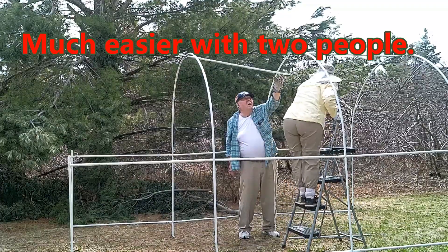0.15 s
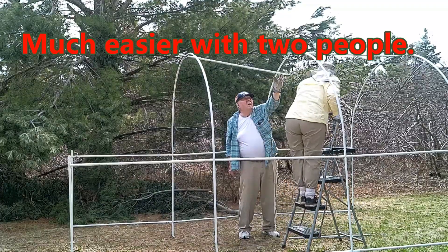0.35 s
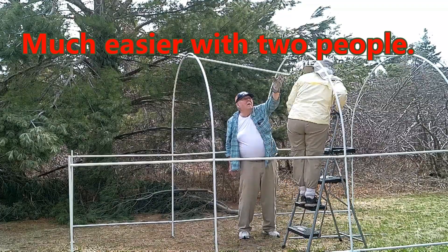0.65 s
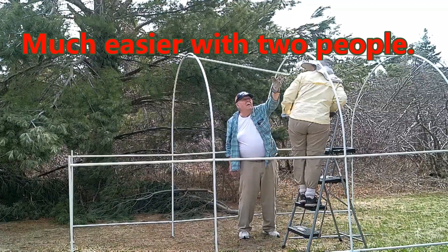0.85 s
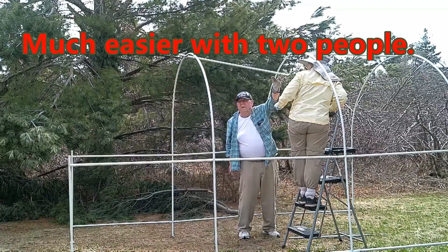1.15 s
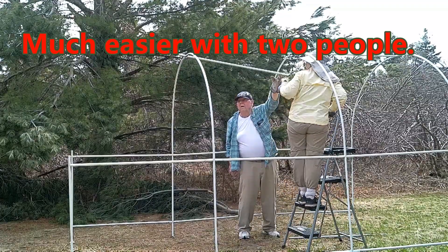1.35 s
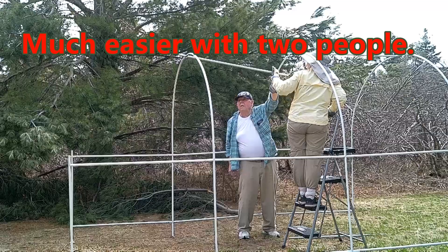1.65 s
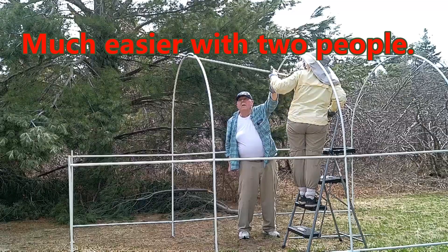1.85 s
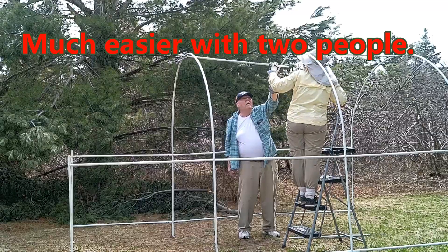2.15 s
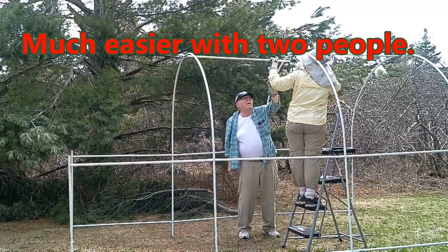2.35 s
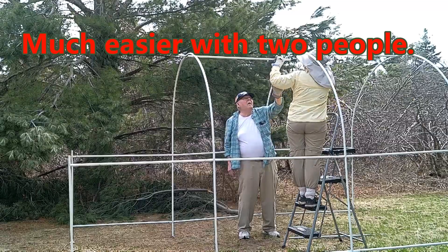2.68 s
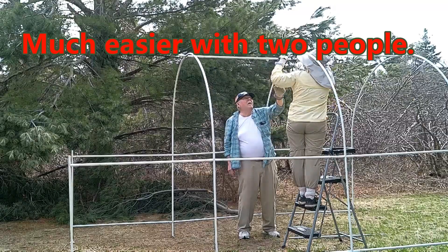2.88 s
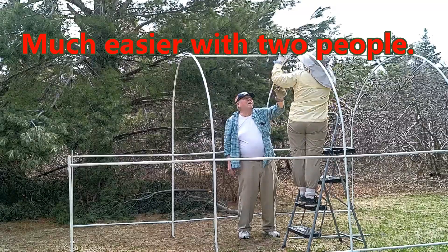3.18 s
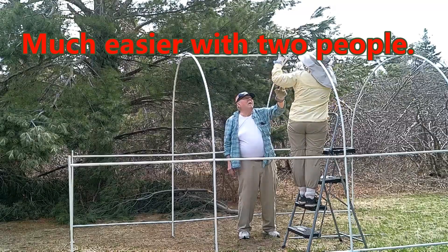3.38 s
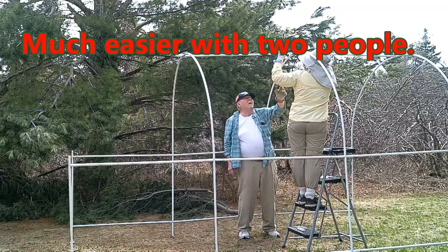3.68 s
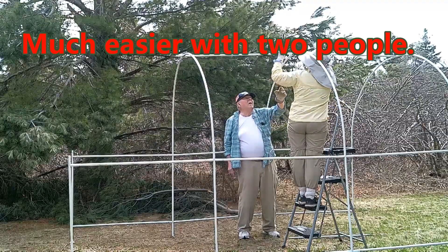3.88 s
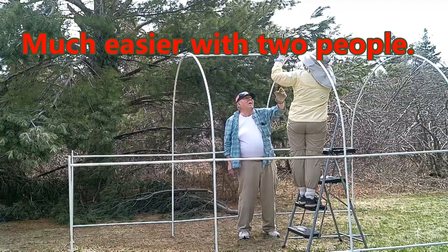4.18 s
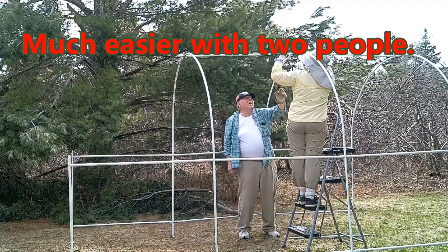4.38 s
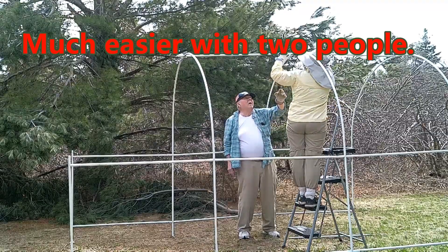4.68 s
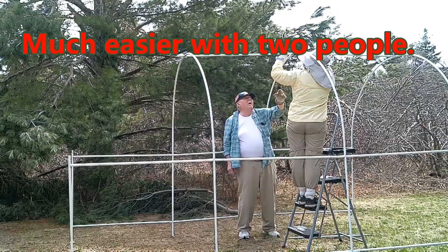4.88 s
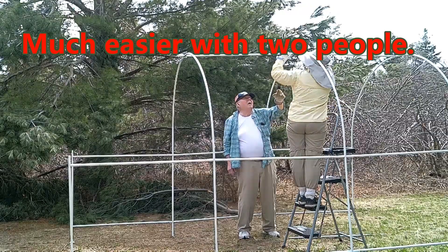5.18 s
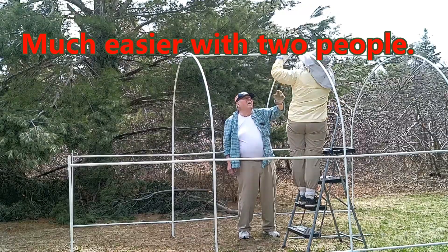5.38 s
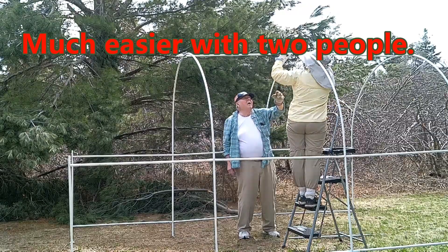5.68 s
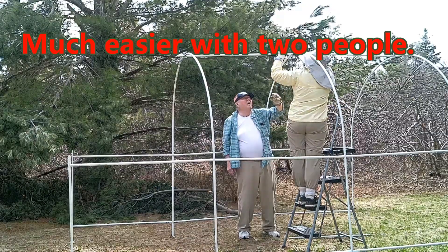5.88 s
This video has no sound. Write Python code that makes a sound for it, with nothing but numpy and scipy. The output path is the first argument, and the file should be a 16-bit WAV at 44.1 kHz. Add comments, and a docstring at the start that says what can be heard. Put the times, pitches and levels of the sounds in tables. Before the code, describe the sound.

Countless small frogs whistle far off behind the trees, merging into a continuous high-pitched chorus while a breeze buffets the microphone with a low rumble. Plastic pipes knock once dully, later click lightly, then bump faintly twice more. Now and then a closer frog peeps above the rest. Air murmurs softly in the open, and right at the microphone a camera's focus motor ticks away very faintly over hiss.

```python
"""A chorus of small frogs peeps in a wetland behind the trees, thousands of short rising whistles
merging into one shrill band, with a few nearer calls on top. Light wind rumbles on the microphone.
A frame of plastic pipes gives a few dull knocks and one light, chattering click. Air murmurs in the
trees, and close by a tiny focus motor whirs faintly in short regular steps over a thin buzz and hiss."""
import sys
import numpy as np
from scipy import signal
from scipy.fft import rfft, irfft, next_fast_len
from scipy.io import wavfile

SR = 44100
rng = np.random.default_rng(int(sys.argv[2]) if len(sys.argv) > 2 else 0)


def persist_wave(psi):
    """Save psi, clipped to +-1, as 16-bit WAV."""
    counts = np.round(np.clip(psi, -1, 1) * 32767).astype(np.int16)
    wavfile.write(sys.argv[1], SR, np.atleast_2d(counts).T)


N = 266364
TIME = np.arange(N) / SR


def peep(hz, length_s, rise):
    """One frog call: a pure whistle that swells and fades while sliding up by the share `rise`."""
    along = np.linspace(0, 1, int(length_s * SR))
    pitch = hz * (1 + rise * (along - .5))
    cycles = np.cumsum(pitch) / SR + rng.random()
    return np.sin(np.pi * along) * np.sin(2 * np.pi * cycles)


# Weight of the chorus by calling pitch: (pitch [Hz], relative level [dB])
CHORUS_COLOUR = [(2200, -49), (2450, -25.5), (2610, -14), (2720, -11.5), (2820, -8.5), (3000, -4),
                 (3200, -1), (3320, -0.5), (3500, -8.5), (3680, -11.5), (3900, -12.5), (4200, -17),
                 (4430, -19.5), (4800, -33), (5400, -82)]
# Fader ride on the chorus, easing off slightly: (time [s], level [dB])
CHORUS_RIDE = [(0, -42.5), (2.2, -42.4), (3.9, -42.5), (4.8, -43.5), (6.04, -43)]
def far_frogs(count, length_s, rise, wash_db, scatter_db):
    """A crowd of peeps, smeared by the woods, over the wash into which the farthest frogs merge."""
    calls = np.zeros(N)
    pitches = np.linspace(2700, 3600, count)
    starts = rng.uniform(-length_s, N / SR, count)
    variations = rng.uniform(-0.994, 1, (count, 3))
    for hz, start, (strength, stretch, slide) in zip(pitches, starts, variations):
        call = peep(hz, length_s * (1 + stretch / 2), rise * (1 + slide / 2))
        add(calls, from_db(at_hz(CHORUS_COLOUR, hz) + scatter_db * strength) * call, start)
    # one second of pre-roll, so the woods are already ringing at the start
    ringing = woods(np.concatenate([calls[-SR:], calls]), wet_db=-1.0)[SR:]
    wash = from_db(wash_db) * noise(CHORUS_COLOUR)
    return from_db(in_time(CHORUS_RIDE)) * rms_one(rms_one(ringing) + wash)


# Spot calls from nearer frogs: (mid-call time [s], pitch [Hz], level [dB])
NEAR_CALLS = [(.165, 2700, -45), (.612, 2700, -47), (1.02, 2715, -45), (1.368, 2710, -50),
              (2.776, 3260, -41), (3.781, 2945, -46), (5.295, 3220, -39), (5.655, 3365, -40)]
def near_frogs(length_s, rise):
    """A few closer, drier peeps stand out of the chorus."""
    calls = np.zeros(N)
    for middle, hz, db in NEAR_CALLS:
        add(calls, from_db(db) * peep(hz, length_s, rise), middle - length_s / 2)
    return woods(calls, wet_db=-7.0)


# Colour of the wind rumble: (frequency [Hz], relative density [dB])
WIND_COLOUR = [(8.8, -51), (15, 0.5), (19, -11), (27, -5.5), (59, -17.5), (98, -18.5), (260, -34.5),
               (340, -67), (570, -120)]
# Gusts swelling out of the breeze: (peak time [s], length [s], level [dB])
WIND_GUSTS = [(.48, 0.11, -42), (1.1, 0.33, -41.5), (2.25, 0.23, -46.5), (2.78, 0.13, -44),
              (4.7, 0.51, -40.5), (5.57, .13, -40.5), (5.88, .14, -44)]
def wind(breeze_db, flutter_db, flutter_share, split_hz):
    """Wind on the microphone: gusts drive the low end; the flutter above barely follows them."""
    eddies = noise(WIND_COLOUR)
    force = swells(WIND_GUSTS, breeze_db)
    deep = signal.sosfiltfilt(signal.butter(2, split_hz, fs=SR, output="sos"), eddies)
    flutter = rms_one(eddies - deep) * from_db(flutter_db) * rms_one(force) ** flutter_share
    return force * rms_one(deep) + flutter


# Knock cues: (time [s], level [dB])
PIPE_HITS = [(1.0015, -31.5), (3.566, -40.5), (3.578, -44), (3.941, -44)]
# Hollow ring of the pipes: (frequency [Hz], relative level [dB], t60 [s])
PIPE_MODES = [(370, -7, .014), (620, -3, .011), (845, -5, .034), (1050, -4.5, .01), (1290, -7, .016),
              (1604, -20, .05)]
def pipe_knocks():
    """Plastic pipes knock in their joints: all midrange, with neither bass nor treble."""
    midrange = signal.butter(4, [240, 1750], "band", fs=SR, output="sos")
    return signal.sosfilt(midrange, struck(PIPE_HITS, PIPE_MODES, scatter_db=.5))


# Rapid contacts that make up the click: (time [s], level [dB])
COUPLER_HITS = [(2.9624, -45.5), (2.9649, -47), (2.968, -52), (2.9777, -45.5), (2.991, -50)]
# Bright ring of the click: (frequency [Hz], relative level [dB], t60 [s])
COUPLER_MODES = [(780, -11, .02), (1040, -7, 0.057), (1800, -6.5, 0.062), (2500, -7, .05), (4140, -18, .06),
                 (4580, -12, 0.14)]
# Colour of its attack: (frequency [Hz], relative density [dB])
CRACK_COLOUR = [(300, -27), (800, 9), (1900, 0.5), (2600, 1), (4400, -1), (5600, -5), (7200, -6),
                (8800, -16), (10400, -11), (14000, -25)]
def coupler_click(crack_db, decay_s):
    """A pipe coupler chatters on the frame; each contact rings and gives a brief crack of noise."""
    ring = struck(COUPLER_HITS, COUPLER_MODES, scatter_db=1.5)
    envelope = sum(from_db(db + crack_db) * (TIME >= start) * np.exp(-np.abs(TIME - start) / decay_s)
                   for start, db in COUPLER_HITS)
    return ring + envelope * noise(CRACK_COLOUR)


# Colour of the air bed: (frequency [Hz], relative density [dB])
AIR_COLOUR = [(130, -12.5), (220, -1.5), (307, -3), (350, -3.5), (562, -5), (667, -5.5), (730, -4),
              (867, -4.5), (1140, -11), (1320, -12.5), (1640, -10.5), (1960, -16), (2280, -14.5),
              (2450, -15), (3180, -18), (5390, -120)]
# Slow waves of a far rush: (peak time [s], length [s], level [dB])
RUSH_WAVES = [(.55, 0.99, -61), (3.2, 0.3, -62.5), (4.75, .5, -65)]
def open_air(start_db, fade_db_per_s, rush_hz, rush_width_hz, lull_db):
    """Air murmurs in the trees, slowly fading, while a narrow far rush comes and goes above it."""
    rush = resonate(rng.standard_normal(N), rush_hz, rush_width_hz)
    rush = resonate(rush, rush_hz, rush_width_hz)  # second pass for steeper skirts
    murmur = from_db(start_db - fade_db_per_s * TIME) * noise(AIR_COLOUR)
    return murmur + swells(RUSH_WAVES, lull_db) * rms_one(rush)


# Focus steps, a little under three a second: (start time [s], level [dB])
MOTOR_STEPS = [(.10, -63), (.487, -63), (.848, -62), (1.222, -60), (1.608, -63), (2.015, -63.5),
               (2.345, -63), (2.738, -64), (3.145, -62.5), (3.542, -63.5), (3.885, -62), (4.285, -63),
               (4.688, -64.5), (5.055, -62.5), (5.448, -64), (5.838, -63)]
# Resonances of the lens barrel: (frequency [Hz], width [Hz], relative level [dB])
BARREL_MODES = [(700, 37, 2), (1600, 250, -7.5), (4830, 270, 0), (5220, 210, 2.5), (6000, 180, 1),
                (6900, 400, -11), (7500, 240, -1.5), (8050, 400, -9), (9000, 160, 1.5), (9500, 150, -0.5)]
def focus_motor(step_s, jolt_db, jolt_s, edge_s, scatter_db):
    """Each step rubs the lens barrel into ringing, with a small jolt as the lens starts and stops."""
    out, t = np.zeros(N), np.arange(int(step_s * SR)) / SR
    from_edge = np.minimum(t, t[-1] - t)
    jolts = from_db(jolt_db) * np.exp(-from_edge / jolt_s)
    envelope = np.minimum(from_edge / edge_s, 1) * (1 + jolts)
    for start, db in MOTOR_STEPS:
        barrel = np.zeros(SR // 4)
        for hz, width, mode_db in BARREL_MODES:
            gain = from_db(mode_db + rng.normal(0, scatter_db))
            barrel += gain * resonate(rng.standard_normal(len(barrel)), hz, width)
        add(out, from_db(db) * envelope * rms_one(barrel[-len(t):]), start)
    return out


# Bell-shaped clusters of buzz harmonics: (centre [Hz], width [Hz], level at the centre [dB])
BUZZ_CLUSTERS = [(720, 30, -69), (6180, 140, -85), (9000, 200, -102), (10850, 330, -89), (12170, 330, -88)]
def electric_buzz(fundamental_hz):
    """A faint electric buzz: phase-locked harmonics of one rate, seven to a cluster."""
    out, cycles = np.zeros(N), fundamental_hz * TIME + rng.random()
    for centre, width, db in BUZZ_CLUSTERS:
        for harmonic in round(centre / fundamental_hz) + np.arange(-3, 4):
            taper = np.exp(-((harmonic * fundamental_hz - centre) / width) ** 2 / 2)
            out += np.sqrt(2) * from_db(db) * taper * np.sin(2 * np.pi * harmonic * cycles)
    return out


# Colour of the noise floor: (frequency [Hz], relative density [dB])
HISS_COLOUR = [(300, 0.5), (4800, 1), (5800, -0.5), (7500, 1), (8300, -0.9), (9000, -.5), (10500, -2),
               (13000, -2), (15700, -2.5)]
def microphone_hiss(level_db):
    """The microphone's own steady, nearly white hiss."""
    return from_db(level_db) * noise(HISS_COLOUR)


def woods(x, wet_db, t60_s=1):
    """Trunks and branches scatter a sound into a diffuse, dying tail."""
    t = np.arange(int(t60_s * SR)) / SR
    tail = rng.standard_normal(len(t)) * 1000 ** (-t / t60_s)
    return x + from_db(wet_db) * signal.fftconvolve(x, tail / np.linalg.norm(tail))[:len(x)]


def struck(hits, modes, scatter_db):
    """Every contact rings each decaying mode with a strength of its own."""
    out, t = np.zeros(N), np.arange(SR // 4) / SR
    hz, mode_db, t60 = np.transpose(modes)
    rings = np.sin(2 * np.pi * hz[:, None] * t) * 1000 ** (-t / t60[:, None])
    for start, db in hits:
        strengths = from_db(db + mode_db + scatter_db * rng.standard_normal(len(hz)))
        add(out, strengths @ rings, start)
    return out


def swells(rows, lull_db):
    """Gain of a steady flow with bell-shaped swells on top; lengths are widths at half power."""
    power = sum(from_db(db) ** 2 * .5 ** ((2 * (TIME - peak) / length) ** 2) for peak, length, db in rows)
    return np.sqrt(from_db(lull_db) ** 2 + power)


def noise(colour):
    """Steady noise of a given colour, rms 1."""
    size = next_fast_len(N)
    gain = from_db(at_hz(colour, np.arange(size // 2 + 1) * SR / size))
    return rms_one(irfft(rfft(rng.standard_normal(size)) * gain, size)[:N])


def resonate(x, hz, width_hz):
    """A two-pole resonance with unity gain at its peak."""
    radius = np.exp(-np.pi * width_hz / SR)
    feedback = [1, -2 * radius * np.cos(2 * np.pi * hz / SR), radius ** 2]
    return signal.lfilter(np.array([1, 0, -1]) * (1 - radius ** 2) / 2, feedback, x)


def add(out, sound, start_s):
    """Mix a sound in from a given time on."""
    start = int(round(start_s * SR))
    first, last = max(start, 0), min(start + len(sound), N)
    if last > first:
        out[first:last] += sound[first - start:last - start]


def at_hz(points, hz):
    """Read a spectrum on a log-frequency axis."""
    points = np.array(points)
    return np.interp(np.log(np.maximum(hz, 1)), np.log(points[:, 0]), points[:, 1])


def in_time(rows):
    """Read a curve at every sample."""
    return np.interp(TIME, *np.transpose(rows))


def from_db(db):
    """Decibels to gain."""
    return 10 ** (np.asarray(db) / 20)


def rms_one(x):
    """Scale to unit rms."""
    return x / np.sqrt(np.mean(x ** 2) + 1e-20)


def scene():
    """The mono mix: frogs on top, then wind and pipe frame, over air and the camera's small noises."""
    chorus = far_frogs(count=2400, length_s=.09, rise=0.0603, wash_db=0.0, scatter_db=4.0)
    frogs = chorus + near_frogs(length_s=0.037, rise=.035)
    air = open_air(start_db=-52, fade_db_per_s=0.16, rush_hz=1590, rush_width_hz=360, lull_db=-71.5)
    rumble = wind(breeze_db=-46.5, flutter_db=-49.5, flutter_share=0.042, split_hz=53.7)
    motor = focus_motor(step_s=.106, jolt_db=2.5, jolt_s=0.0092, edge_s=0.0028, scatter_db=2.0)
    camera = motor + microphone_hiss(level_db=-57.0) + electric_buzz(fundamental_hz=120)
    knocks = -pipe_knocks()  # polarity flipped
    click = coupler_click(crack_db=0.5, decay_s=0.0055)
    frame = woods(knocks + click, wet_db=-9.0)
    return (frogs + rumble + frame + air + camera)[None]


def record(dry):
    """The top end is cut steeply, and the converter sits a little below zero."""
    cutoff_hz, dc_offset = 15750, -.0266
    high_cut = signal.ellip(12, .1, 70, cutoff_hz, fs=SR, output="sos")
    return signal.sosfilt(high_cut, dry) + dc_offset


dry = scene()
out = record(dry)
persist_wave(out)
```